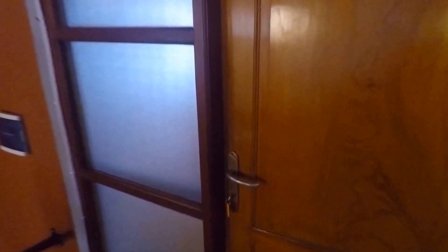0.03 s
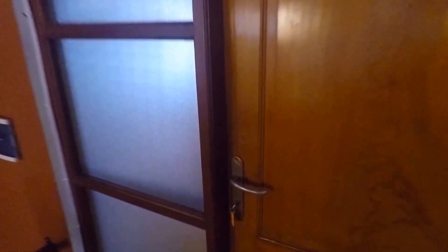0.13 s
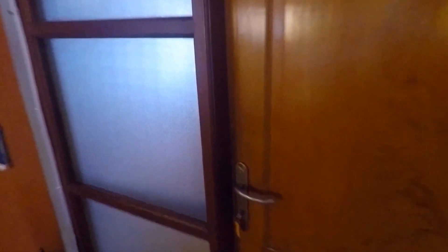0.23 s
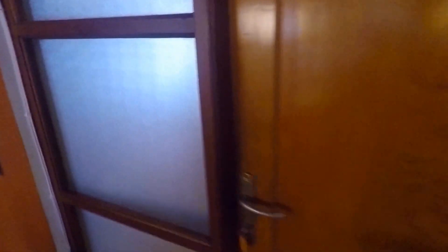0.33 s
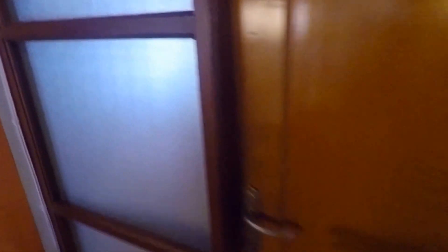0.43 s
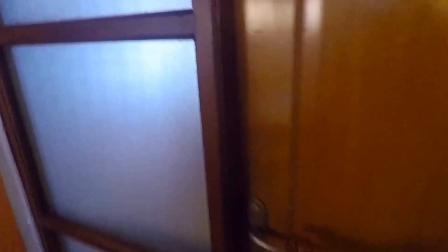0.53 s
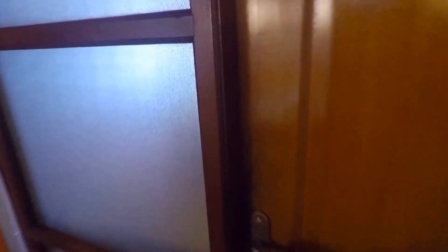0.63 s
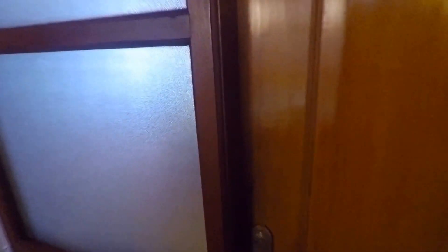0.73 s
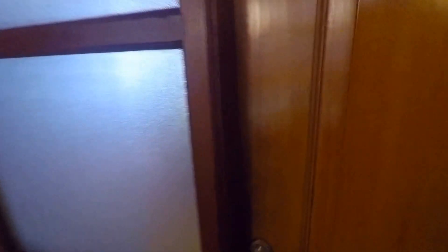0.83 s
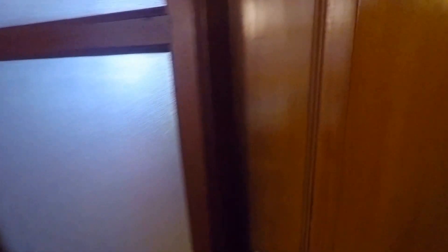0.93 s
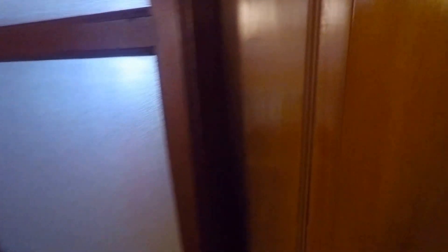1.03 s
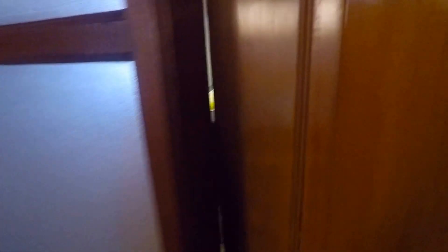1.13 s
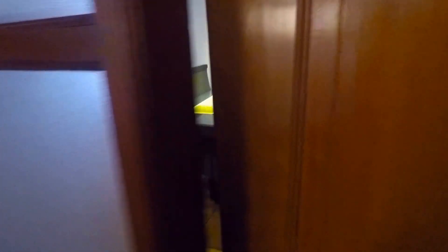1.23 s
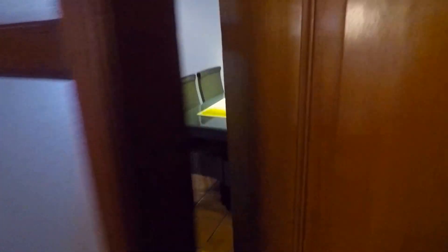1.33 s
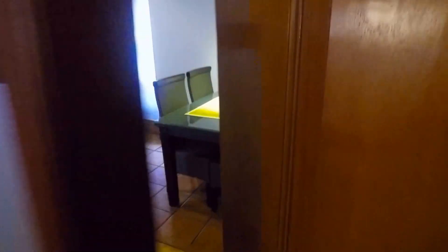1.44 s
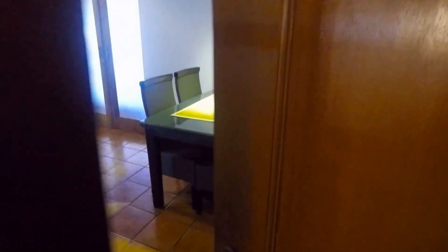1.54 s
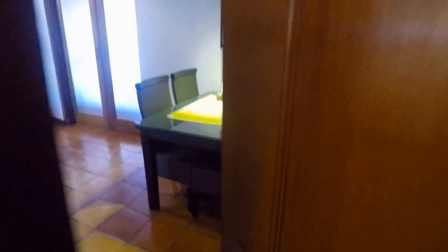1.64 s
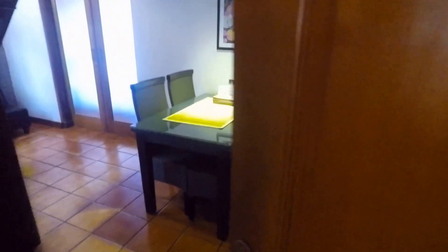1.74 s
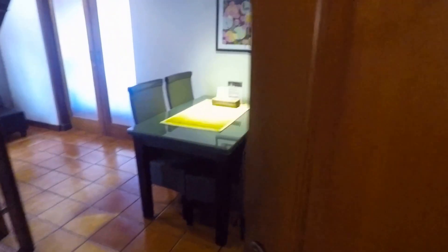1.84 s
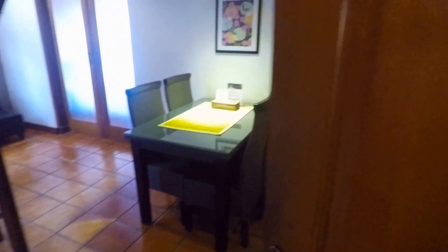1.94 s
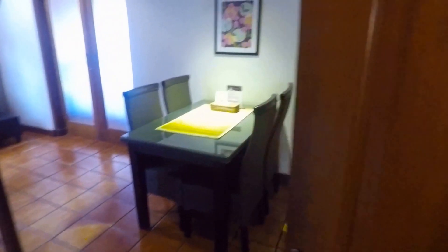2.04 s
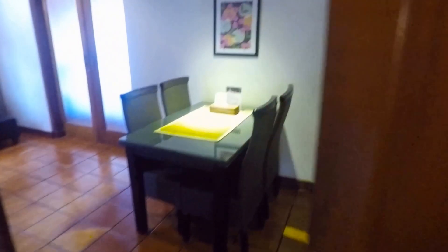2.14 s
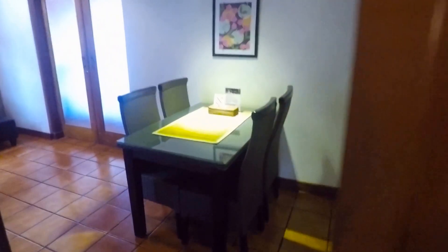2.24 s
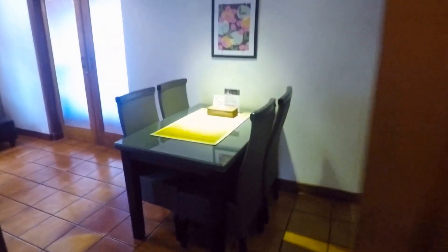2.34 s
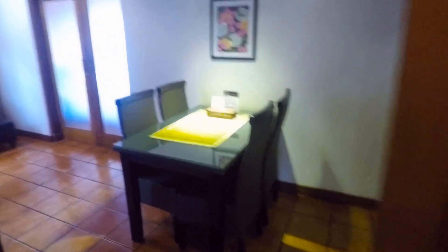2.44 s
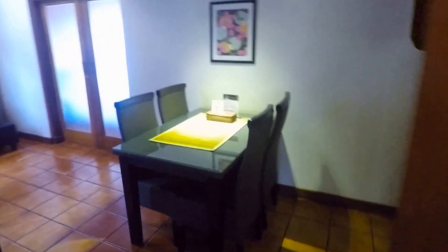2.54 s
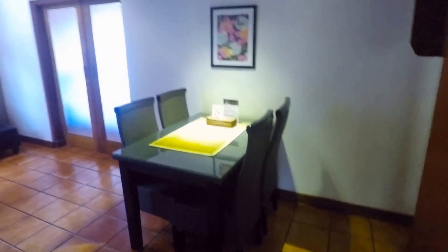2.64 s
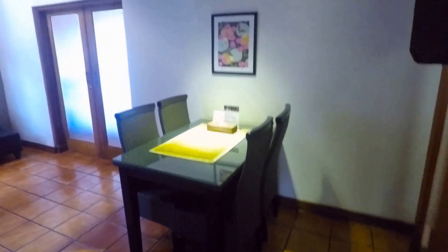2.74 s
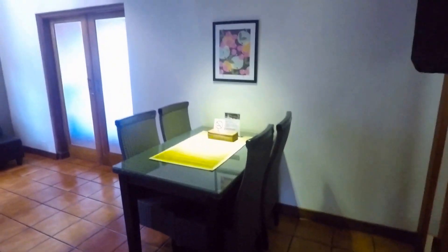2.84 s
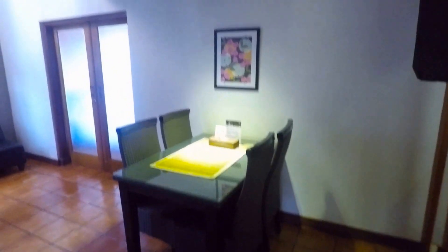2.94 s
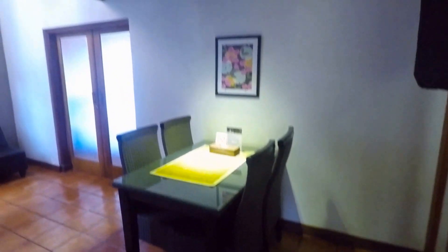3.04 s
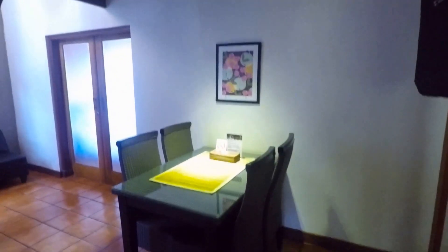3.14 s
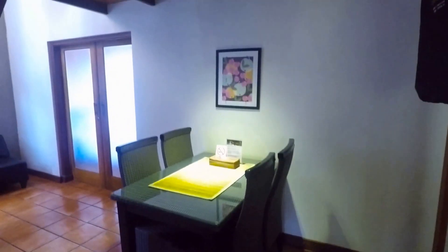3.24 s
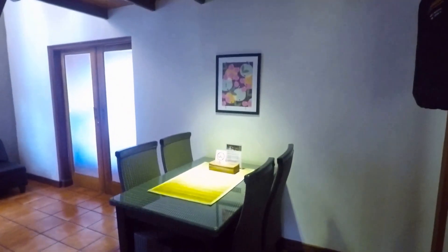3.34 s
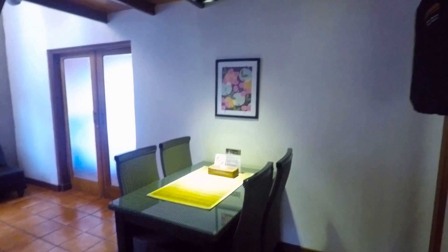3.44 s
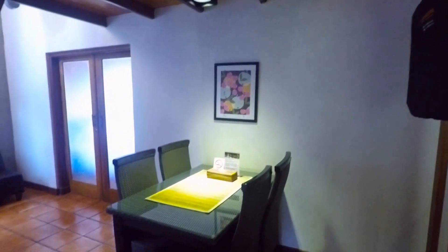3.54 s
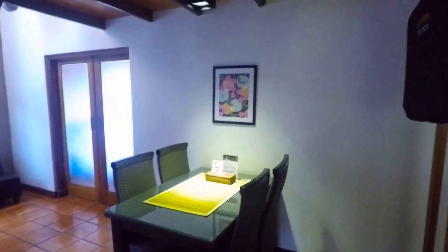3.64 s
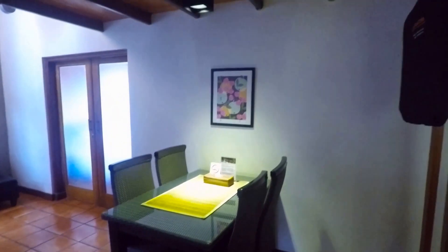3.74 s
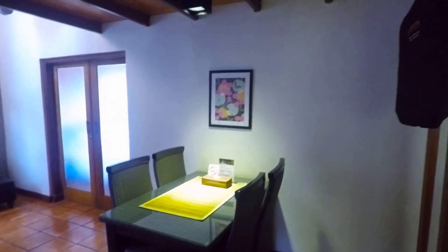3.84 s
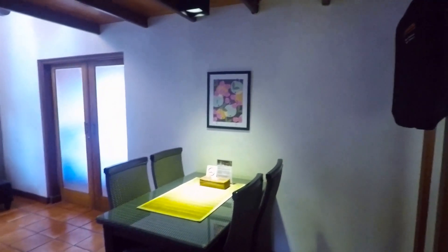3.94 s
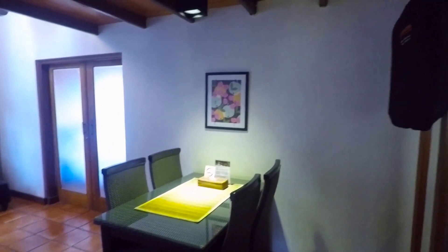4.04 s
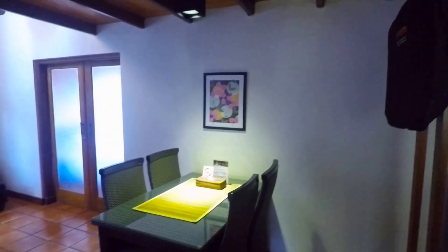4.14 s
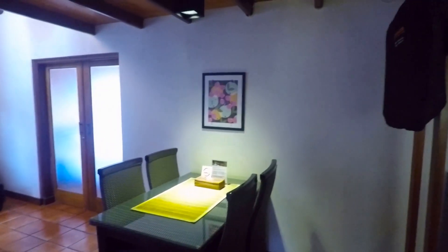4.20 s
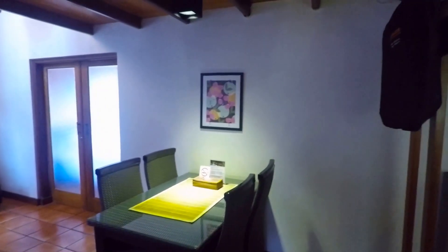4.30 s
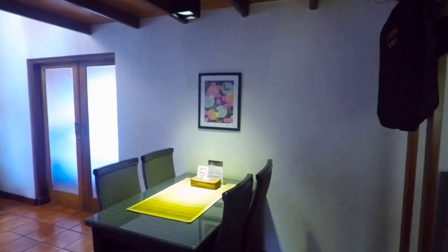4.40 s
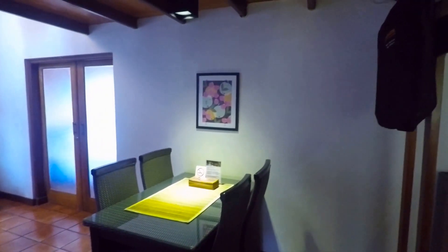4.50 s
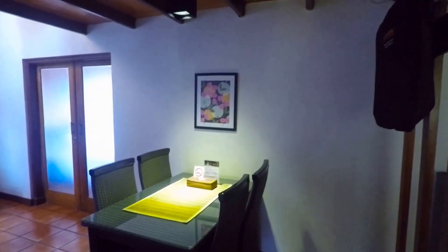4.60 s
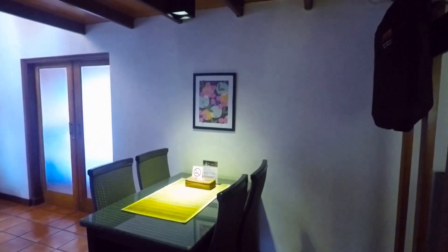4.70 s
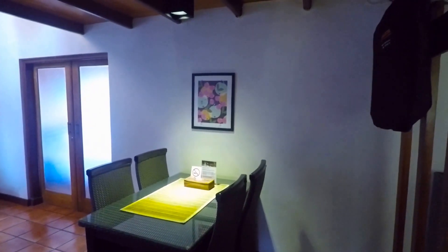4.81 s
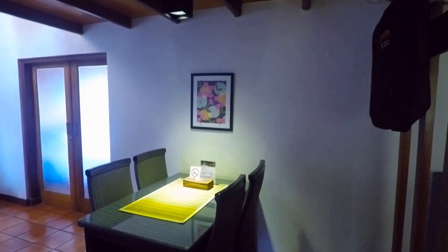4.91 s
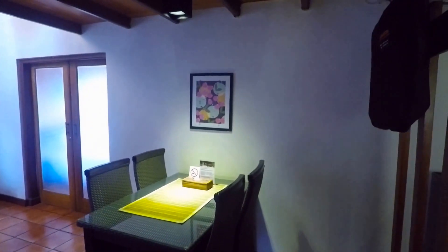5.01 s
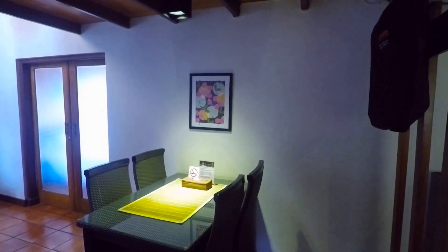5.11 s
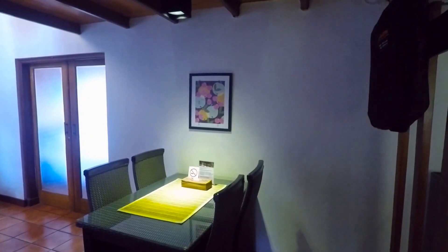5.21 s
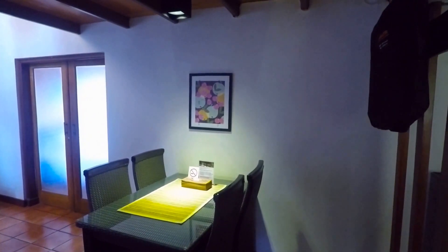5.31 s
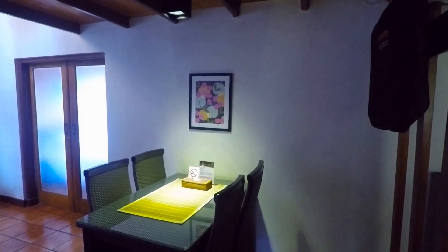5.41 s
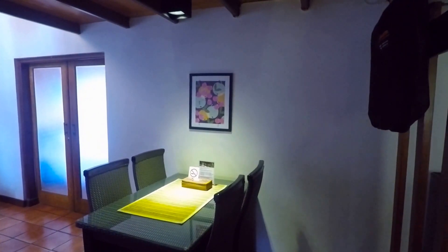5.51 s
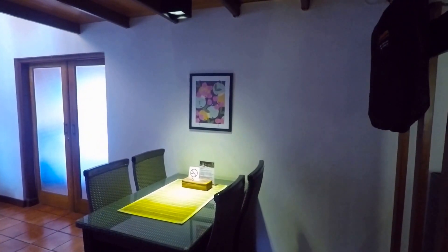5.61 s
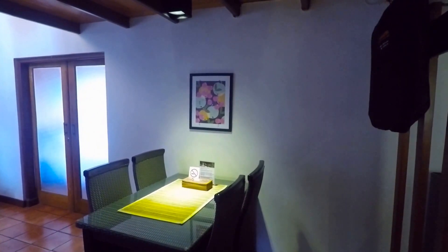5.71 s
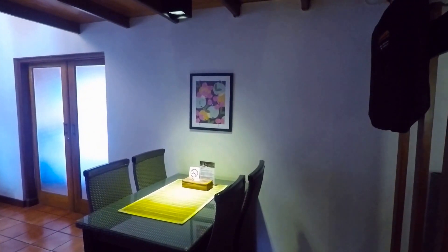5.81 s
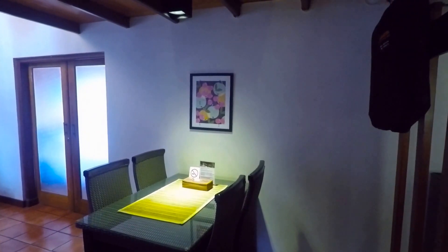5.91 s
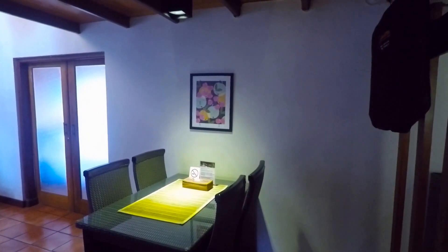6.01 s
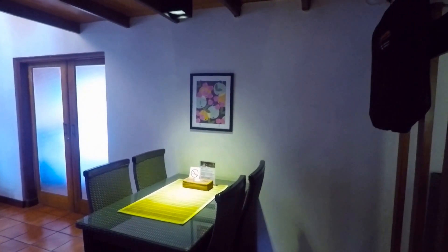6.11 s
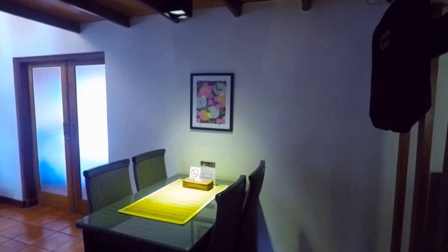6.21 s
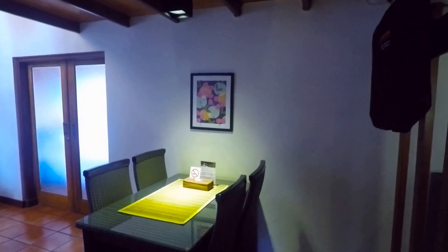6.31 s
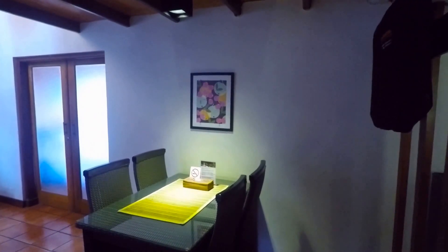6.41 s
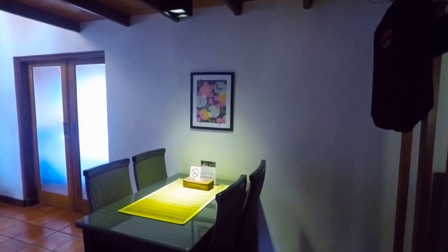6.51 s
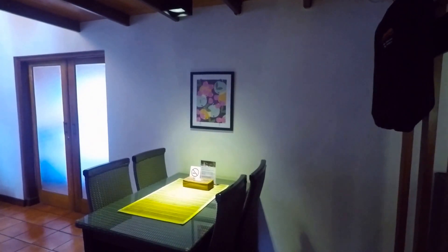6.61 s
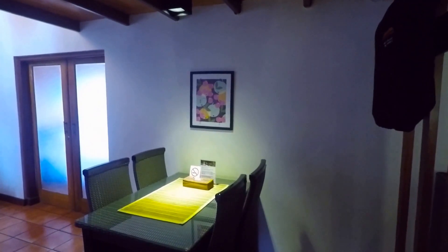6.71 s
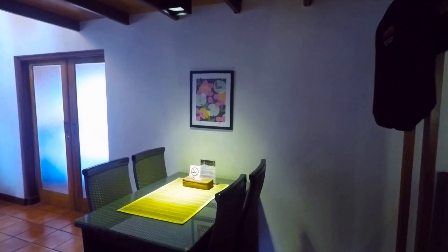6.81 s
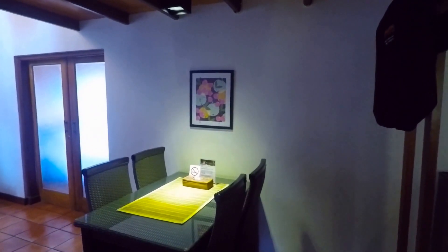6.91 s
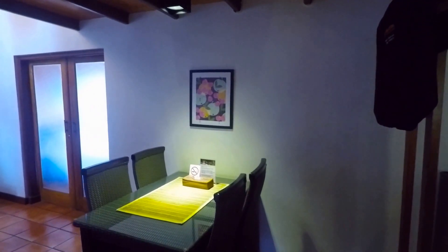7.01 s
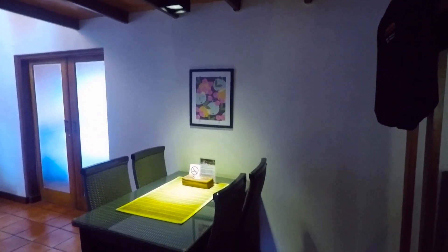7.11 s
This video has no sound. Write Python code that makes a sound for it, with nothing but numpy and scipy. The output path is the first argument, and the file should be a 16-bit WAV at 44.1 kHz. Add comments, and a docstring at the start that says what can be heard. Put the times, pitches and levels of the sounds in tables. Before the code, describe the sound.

For the first 0.9 seconds there is a quiet, bassy room hum that grows slightly, with faint dull rustles close by at about 0.2 and 0.7. A very short hiss of noise leads into a loud wooden door slam at 0.95: several latch clacks packed together, a splintery crack, a short low thud and a ringing wooden panel. Weaker chatter follows until 1.15, with a heavy swing of low air and reverberation from the hard tiled room. From 1.3 to 1.9 loose fittings tick faintly and rapidly. A deep, uneven rumble like muffled traffic takes over from about 1.0 and lasts to the end, swelling into booms near 1.4, 1.8, 3.5, 4.8 and 6.2. An airy rustle passes at 2.5; a very faint high whine enters around 4.1 and weakens. A soft double bump with rustle comes at 5.1, and a slight roar surge and faint rustle near 7.1.

```python
"""Door slam in a tiled room

A brief noise swells and a wooden leaf hits the frame: noise bursts, ringing modes, a thud, heaving
air and reverberation; loose fittings rattle on. Quiet room tone gives way to a deep rumble, like traffic outside:
filtered noise with wavering tones for the room modes that boom. Rustles and bumps lie close by; a thin tone
comes in late."""
import sys
import numpy as np
from scipy import signal
from scipy.fft import rfft, irfft
from scipy.io import wavfile

SR = 44100
rng = np.random.default_rng(int(sys.argv[2]) if len(sys.argv) > 2 else 0)


def file_out(sig):
    """Save sig as 16-bit WAV at sys.argv[1]."""
    # one column per channel
    cols = np.atleast_2d(sig).T
    # limit, then scale
    lim = np.clip(cols, -1, 1)
    pcm = np.round(lim * 32767).astype(np.int16)
    wavfile.write(sys.argv[1], SR, pcm)


N = 315315
TIME = np.arange(N) / SR
FREQS = np.maximum(np.fft.rfftfreq(N, 1 / SR), 1)
THUD_S = 0.954           # the leaf meets the frame
RUMBLE_START_S = 1.033   # the rumble has reached its strength and the room tone begins to die away

# latch and leaf meet the frame, then the leaf chatters in the latch: (time [s], crack level [dB],
# crack decay to -60 dB [s], crack brightness [dB per octave], relative blow on the leaf [dB])
CONTACTS = [(0.9428, -18, 0.044, 1, -32), (0.9472, -12, 0.016, 2.5, -19.5), (0.9494, -13, 0.015, -1, -20),
            (0.954, -14, 0.05, -2.5, -15), (0.9629, -16, 0.075, -2.5, -20.5),
            (1.0178, -28.5, 0.065, -1, -21.5), (1.044, -29, 0.076, -1.5, -28.5),
            (1.072, -30, .04, -1, -32.5), (1.148, -29, 0.058, -6, -29.5)]
# the slam at two close ports: (frequency [Hz], left-right level [dB], phase lead of the left [rad], likeness [0-1])
SLAM_PORTS = [(350, -2.5, -0.1, 1), (550, -7.5, -0.2, 1), (680, -14, 0.6, .95), (856, -6, 2.1, 0.91),
              (1220, 7, 2.4, 0.75), (1450, 5, -1.5, 0.7), (1900, 1.5, -0.2, 0.97), (2700, -1, -0.1, 0.98),
              (4300, 2, -0.3, 0.9), (5400, -1, -0.6, .6), (7000, -0.5, 0, .7), (14000, 1.5, 0.5, .7)]


def from_db(db):
    """Decibels are logarithmic: 20 dB is a factor of ten in amplitude."""
    return 10 ** (np.asarray(db) / 20)


def rms_one(x):
    """Normalisation by the root mean square gives a signal unit power."""
    return x / np.sqrt(np.mean(x ** 2) + 1e-20)


def at_hz(rows, hz):
    """Interpolation along log frequency, as hearing spaces pitch, of each column of a table."""
    f, *columns = np.transpose(rows)
    return [np.interp(np.log(hz), np.log(f), column) for column in columns]


def noise(colour):
    """Spectral shaping of white noise to unit rms, falling steeply outside the table."""
    outside = np.minimum(FREQS / colour[0][0], 1) * np.minimum(colour[-1][0] / FREQS, 1)
    gain = from_db(at_hz(colour, FREQS)[0]) * outside ** 5
    white = rng.standard_normal(N)
    return rms_one(irfft(rfft(white) * gain, N))


def drift(rate_hz):
    """Low-passed noise is a slow random fluctuation, here of spread 1 and drawn on a coarse time grid."""
    coarse = TIME[::64]
    hz = np.fft.rfftfreq(len(coarse), coarse[1])
    spectrum = rfft(rng.standard_normal(len(coarse))) / (1 + (hz / rate_hz) ** 4)
    return np.interp(TIME, coarse, rms_one(irfft(spectrum, len(coarse))))


def fade(start, t60, rise=0.00024):
    """Exponential growth up to the start time (time constant rise), then decay by 60 dB in t60 seconds."""
    age = TIME - start
    exponent = np.minimum(age / rise, -age * np.log(1000) / t60)
    return np.exp(np.maximum(exponent, -40))


def swell(start, hold, attack, t60):
    """Linear onset ending at the start time, a steady hold, then exponential decay."""
    onset = np.clip(1 + (TIME - start) / attack, 0, 1)
    return onset * np.exp(-np.log(1000) * np.clip((TIME - start - hold) / t60, 0, 10))


def ring(clicks, hz, t60):
    """Damped resonator: a unit click sets a decaying sine of height 1 ringing."""
    radius, angle = np.exp(-np.log(1000) / (t60 * SR)), 2 * np.pi * hz / SR
    poles = [1, -2 * radius * np.cos(angle), radius * radius]
    return signal.lfilter([0, np.sin(angle)], poles, clicks + 1e-18)


def strikes(times, levels_db):
    """Impulse excitation: single clicks at the given times."""
    out = np.zeros(N)
    out[(np.asarray(times) * SR).astype(int)] = from_db(levels_db)
    return out


def ports(shared, diffuse, table):
    """Spatial coherence: two close ports differ in level and phase, and diffuse sound is opposed in them."""
    balance_db, lead, alike = at_hz(table, FREQS)
    apart = np.minimum(FREQS / 400, 1)
    alike = 1 - (1 - np.clip(alike, 0, 1)) * apart ** 2     # long waves reach both ports alike
    mid = rfft(shared) * np.sqrt((1 + alike) / 2)
    side = rfft(diffuse) * np.sqrt((1 - alike) / 2)
    left = from_db(balance_db * apart ** 2) * np.exp(1j * lead * apart)
    pair = np.array([(mid + side) * left, mid - side])
    return irfft(pair * 2 / np.abs(1 + left), N)


def room_tone(level_db=-30.0, growth_db_per_s=3.0, release_t60=0.66):
    """Stationary coloured noise, the same in both ears, grows a little and then decays exponentially."""
    # quiet hum: (frequency [Hz], relative level per hertz [dB])
    hum_colour = [(20, 6), (37, 3), (50, 0.5), (85, -11.5), (124, 2.5), (150, -7.5), (230, -17),
                  (380, -21.5), (650, -32), (1600, -39), (3100, -45), (3600, -53.5), (7000, -55.5),
                  (9500, -51.5), (15000, -66)]
    level = from_db(level_db + growth_db_per_s * np.minimum(TIME, RUMBLE_START_S))
    release = fade(RUMBLE_START_S, release_t60, rise=np.inf)
    return level * release * noise(hum_colour)


def booming(hz, waver_hz=1.414, flutter_db=2.0):
    """A room mode driven by noise is a narrow-band tone, unsteady in pitch and level."""
    phase = 2 * np.pi * np.cumsum(hz + waver_hz * drift(8.8)) / SR
    return rms_one(from_db(flutter_db * drift(11.8)) * np.sin(phase))


def steady_modes():
    """Standing waves: low room modes, always softly excited by the rumble."""
    # (frequency [Hz], level before the rumble's strength [dB])
    low_modes = [(108, -33), (132, -32.5), (147, -32), (213, -39.5)]
    return sum(from_db(db) * booming(hz) for hz, db in low_modes)


def booms(attack_s=0.2, t60=1.33):
    """Resonant build-up and decay: now and then a room mode swells into a boom."""
    # (time [s], hold [s], frequency [Hz], level [dB])
    boom_events = [(1.205, 0.53, 162, -30), (1.3, 0.74, 182, -30.5), (1.353, 0.37, 109, -22.5),
                   (1.817, 0.46, 132, -21.5), (2.05, 0.22, 149, -24), (2.66, .25, 133, -28),
                   (3.503, 1.6, 108, -25), (3.547, 0.5, 78, -26), (3.6, 1.6, 133.2, -30),
                   (4.803, 0.733, 84, -21.5), (5.206, 0.3, 147, -23.5), (6.134, 0.6, 61.1, -26.5),
                   (6.305, 0.67, 106, -24), (6.696, .3, 212.2, -32)]
    return sum(from_db(db) * swell(s, hold, attack_s, t60) * booming(hz) for s, hold, hz, db in boom_events)


def rumble(deep_db=-20, roar_db=-32, hiss_db=-55, lumpy_db=0.5, attack_s=0.13):
    """Amplitude-modulated noise bands: a lumpy deep rumble and mid roar with faint hiss, and the room modes."""
    # one strength moves the noise bands and the steady modes: (time [s], level [dB])
    strength_curve = [(1.3, -0.5), (2.2, -0.5), (2.7, -0.5), (3.9, 0.5), (5.4, -0.5), (6.0, -1.45),
                      (6.9, -1)]
    # noise bands: (frequency [Hz], relative level per hertz [dB])
    deep_colour = [(15, -33.5), (25, -1), (75, -1.5), (139, -4), (182, -9.5), (252, -13), (330, -33),
                   (430, -41), (730, -120)]
    roar_colour = [(150, -28), (260, -4.5), (343, -6), (473, -7.5), (613, -9), (816, -17), (950, -24.5),
                   (1040, -23), (1120, -29.5), (2200, -41.5), (2860, -68), (4840, -120)]
    hiss_colour = [(1500, 0.5), (2300, -2.5), (3100, -2), (5300, -8.5), (9800, -11), (13400, -20),
                   (15000, -30.5)]
    # two close ports: (frequency [Hz], left-right level [dB], phase lead of the left [rad], likeness [0-1])
    rumble_ports = [(380, -3, -0.2, 0.98), (604, -10, -0.35, 1), (690, -19, -0.1, 0.85),
                    (740, -16, 1.5, 0.85), (845, -8.5, 2.1, 0.98), (1270, -4, 2.3, 0.65),
                    (1840, -0.5, 1.3, 0.61), (2550, -2, -0.6, 0.42), (4400, 0.5, 0, 0.35),
                    (8000, -1.5, 0, .05)]
    onset = np.clip(1 + (TIME - RUMBLE_START_S) / attack_s, 0, 1)
    strength = from_db(np.interp(TIME, *np.transpose(strength_curve))) * onset
    # roar and hiss are shaded until the way to the next room is open
    shade_db = np.where(TIME > 2.22, 0, -1)
    lumps = from_db(lumpy_db * drift(32))
    deep = from_db(deep_db) * lumps
    roar = from_db(roar_db + shade_db) * lumps
    roar = roar + from_db(-36) * swell(7.05, hold=0.11, attack=0.05, t60=0.5)   # the roar surges briefly
    hiss = from_db(hiss_db + shade_db)
    shared, diffuse = [deep * noise(deep_colour) + roar * noise(roar_colour) + hiss * noise(hiss_colour)
                       for _ in range(2)]
    return ports(strength * (shared + steady_modes()) + booms(), strength * diffuse, rumble_ports)


def whine(start_s=4.15, hz=2702, level_db=-67, loss_db_per_s=2, attack_s=0.2, flutter_db=2.5):
    """Frequency and amplitude modulation: a faint electrical tone wavers, flutters and slowly weakens."""
    age = TIME - start_s
    level = from_db(level_db - loss_db_per_s * age + flutter_db * drift(9)) * np.clip(1 + age / attack_s, 0, 1)
    phase = 2 * np.pi * np.cumsum(hz + 1.15 * drift(4.7)) / SR
    return level * np.sqrt(2) * np.sin(phase)


def rustles(rough_db=1.5):
    """Friction noise: dull and airy bands share finely grained swells."""
    # (time [s], level [dB], rise time constant [s], decay to -60 dB [s], airy share [0-1])
    rustle_events = [(0.222, -51.5, 0.022, 0.48, 0.2), (0.325, -56, .004, 0.2, 0.3),
                     (0.68, -52, 0.0053, 0.61, 0.32), (2.495, -51.5, 0.03, 0.5, 1),
                     (2.555, -59, 0.027, .55, .9), (5.125, -56, 0.0081, 0.43, 0.7),
                     (7.101, -58.5, 0.05, 0.73, 0.7)]
    # (frequency [Hz], relative level per hertz [dB])
    dull_colour = [(1500, -22), (2500, 11), (3200, 5.5)]
    airy_colour = [(2000, -2), (4600, 1.5), (7500, -10), (10500, -17), (14000, -25)]
    swells = np.array([from_db(db) * fade(s, t60, rise) for s, db, rise, t60, _ in rustle_events])
    swells = swells * from_db(rough_db * drift(200))
    airy_share = np.clip(np.array(rustle_events)[:, -1], 0, 1)
    airy, dull = airy_share @ swells, (1 - airy_share) @ swells
    shared, diffuse = [airy * noise(airy_colour) + dull * noise(dull_colour) for _ in range(2)]
    return ports(shared, diffuse, SLAM_PORTS)


def bumps(softness_hz=680):
    """Impulse response of a small body: low-passed knocks ring the modes of the microphone body."""
    # (time [s], click level before filtering [dB])
    bump_events = [(5.1277, -10.5), (5.208, -22.5)]
    # (frequency [Hz], relative level [dB], decay to -60 dB [s])
    body_modes = [(213, 5, 0.03), (405, -7, 0.036), (530, -6, 0.029)]
    soften = signal.butter(6, softness_hz, fs=SR, output="sos")
    knocks = signal.sosfilt(soften, strikes(*np.transpose(bump_events)) + 1e-18)
    body = -sum(from_db(db) * ring(knocks, hz, t60) for hz, db, t60 in body_modes)
    return ports(body, np.zeros(N), SLAM_PORTS)


def rattle(click_t60=0.041, tail_t60=0.56, tail_db=-12.5):
    """Repeated impact: loose fittings click in quick succession as they settle, each with a room tail."""
    # (time [s], level [dB])
    rattle_clicks = [(1.2898, -48), (1.324, -50), (1.353, -53), (1.386, -50.5), (1.4176, -54), (1.451, -56),
                     (1.4957, -50.5), (1.526, -54), (1.591, -52.5), (1.6236, -52), (1.6995, -56),
                     (1.7255, -55.5), (1.9215, -54.5)]
    # (frequency [Hz], relative level per hertz [dB])
    rattle_colour = [(1500, -7), (3000, -2.5), (4600, 2.5), (6200, -9.5), (8000, -26)]
    envelope = sum(from_db(db) * (fade(s, click_t60) + from_db(tail_db) * fade(s, tail_t60))
                   for s, db in rattle_clicks)
    shared, diffuse = [envelope * noise(rattle_colour) for _ in range(2)]
    return ports(shared, diffuse, SLAM_PORTS)


def reverberation(level_db=-16.0, start=0.98, ripple_db=-0.5, ripple_s=0.03):
    """Reverberant decay: dense wall reflections are noise whose bands die away at rates of their own."""
    # (frequency [Hz], relative level per hertz [dB])
    field_colour = [(50, -21.5), (90, -3.5), (231, -15), (400, -19), (555, -23.5), (852, -27),
                    (1200, -33.5), (1400, -33), (1900, -30), (2200, -32.5), (2800, -29), (3500, -38.5),
                    (4250, -33.5), (5200, -39.5), (6300, -38.5), (10100, -59), (13600, -54), (15000, -70)]
    # (frequency [Hz], decay to -60 dB [s])
    decay_times = [(100, 0.95), (500, 1.85), (1500, 0.63), (4000, 1.15), (8000, 0.65), (14000, 0.34)]
    # the many close modes of the wood ripple the spectrum
    ripple = rms_one(rfft(rng.standard_normal(N) * (TIME < ripple_s)).real)
    field = rfft(noise(field_colour)) * from_db(ripple_db * np.tanh(ripple))
    centres = np.geomspace(80, 15000, num=9)
    out = 0
    for hz, share in zip(centres, np.eye(len(centres))):
        # overlapping triangular bands on a log frequency axis
        band = irfft(field * np.interp(np.log(FREQS), np.log(centres), share), N)
        out = out + band * fade(start, at_hz(decay_times, hz)[0], rise=0.0049)
    return from_db(level_db) * out


def heave(rough_db=-5.0, t60=0.69):
    """Low-frequency air oscillation: the pushed air swings slowly and unevenly in the room."""
    # at the slam and once more as it swings back: (time [s], hold [s], level [dB], attack [s])
    heave_events = [(0.954, 0.016, -9.5, 0.029), (1.125, 0.17, -14.5, 0.092)]
    swing_hz = 32 + 20 * fade(0.99, 0.502, rise=0.071) + 3.1 * drift(21)
    swing = np.sin(2 * np.pi * np.cumsum(swing_hz * (TIME > THUD_S)) / SR)
    rough = from_db(rough_db) * noise([(26, 9.0), (50, -4), (75, -9.0)])
    envelope = sum(from_db(db) * swell(s, hold, attack, t60) for s, hold, db, attack in heave_events)
    return (swing + rough) * envelope


def lead_in(level_db=-16):
    """Shaped noise: a faint noise swells for a few milliseconds into the slam."""
    hiss = noise([(2100, -14.5), (2900, -1.5), (3900, -40), (7200, -27), (14000, -37)])
    return from_db(level_db) * hiss * fade(0.95, 0.075, rise=0.009)


def thud(level_db=-3.5, hz=140):
    """Momentum transfer: the leaf's blow on the frame is a short, heavily damped low tone."""
    return from_db(level_db) * fade(THUD_S, 0.033, rise=0.0066) * np.cos(2 * np.pi * hz * (TIME - THUD_S))


def crack():
    """Impact noise: each contact is a splintery burst, bright for metal on metal, dull for wood on wood."""
    # (frequency [Hz], relative level per hertz before the contact's brightness [dB])
    crack_colour = [(180, -21), (350, -1), (550, 3), (920, -21), (1200, -8), (1500, -15.5), (1900, -7),
                    (2740, -6.5), (3500, -9), (4400, -6.5), (5100, -14.5), (6680, -13), (9760, -32),
                    (11500, -33), (13300, -23), (15500, -33)]
    out = 0
    for s, db, t60, tilt, _ in CONTACTS:
        tilted = [(hz, level + tilt * np.log2(hz)) for hz, level in crack_colour]
        out = out + from_db(db) * fade(s, t60) * noise(tilted)
    return out


def leaf(level_db=-15.5, pair_detune=0.004):
    """Modal vibration: close pairs of modes, each struck by every contact with a strength of its own."""
    # leaf and lock: (frequency [Hz], relative level [dB], decay to -60 dB [s])
    door_modes = [(86.75, 1, 0.78), (160.8, -4.5, 0.36), (244, -12, 0.68), (318, -12.5, 0.5),
                  (389, -4.5, 0.34), (413, -7, 0.29), (452, -13, 0.3), (524, -6, 0.3), (552, -3.5, 0.4),
                  (598, -8.5, 0.27), (678, -12.5, 0.47), (1230, -24.5, 0.5), (1655, -21, 0.37),
                  (1891, -17.5, 0.35), (1960, -21, 0.5), (2403, -21.5, 0.46), (2722, -21, 0.71),
                  (2835, -22, 0.48), (3040, -21, 0.45), (3940, -26, .6), (4250, -27, 0.41)]
    s, *_, blow_db = np.transpose(CONTACTS)
    out = 0
    for hz, db, t60 in door_modes:
        for twin_hz in (hz * (1 - pair_detune), hz * (1 + pair_detune)):
            blows = strikes(s, blow_db + rng.normal(0, 2.3, len(s))) * rng.choice([-1, 1], N)
            mode = ring(blows, twin_hz, t60)
            out = out + from_db(level_db + db) * mode / np.abs(mode).max()
    return out


def slam():
    """Superposition: lead-in noise, cracks, ringing leaf and reverberation at both ports, thud and heaving air."""
    shared = lead_in() + crack() + leaf() + reverberation()
    diffuse = crack() + leaf() + reverberation()
    return thud() + heave() + ports(shared, diffuse, SLAM_PORTS)


def scene():
    """Linear superposition of all sources at the microphone pair, eased in over a few milliseconds."""
    sources = room_tone() + rumble() + whine() + rustles() + bumps() + rattle() + slam()
    return sources * np.minimum(TIME / .008, 1)


def record(dry, top=0.99):
    """Saturation rounds the highest peaks, and a zero-phase low-pass cuts the extreme treble."""
    low_pass = signal.ellip(10, .05, 60, 15400, fs=SR, output="sos")   # edge at 15400 Hz
    return signal.sosfiltfilt(low_pass, top * np.tanh(dry / top))


dry = scene()
out = record(dry)
file_out(out)
```